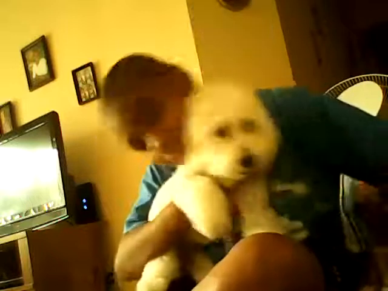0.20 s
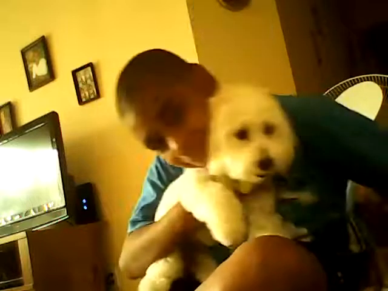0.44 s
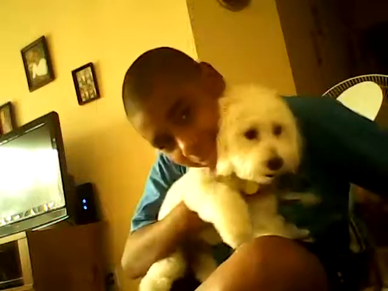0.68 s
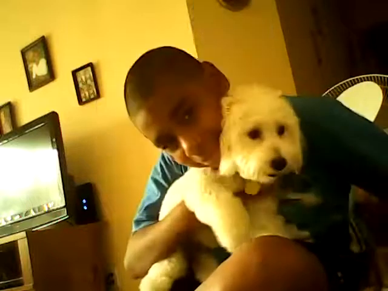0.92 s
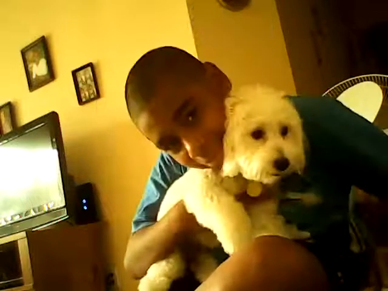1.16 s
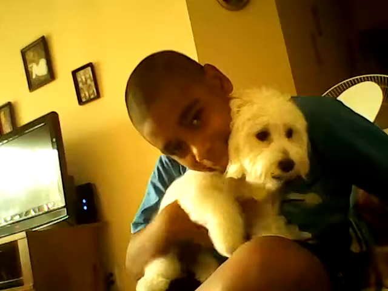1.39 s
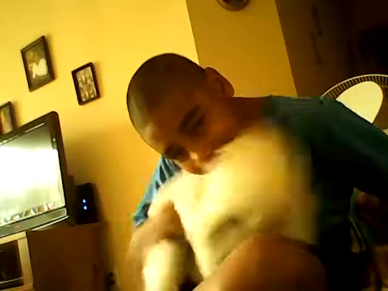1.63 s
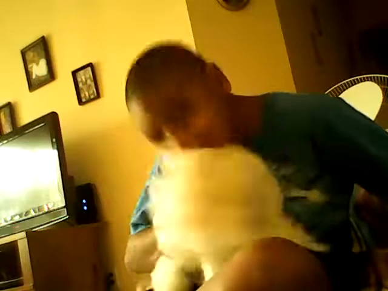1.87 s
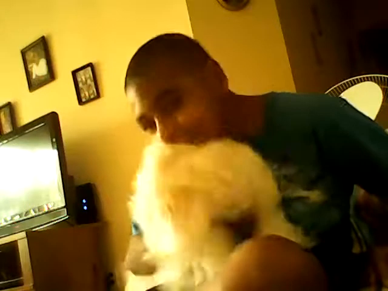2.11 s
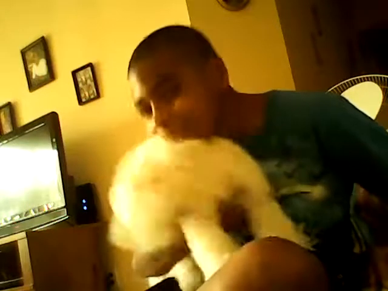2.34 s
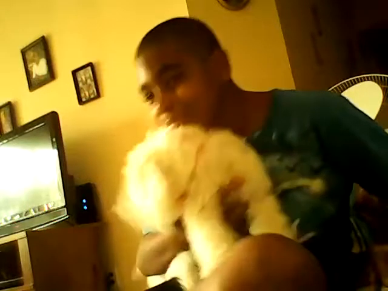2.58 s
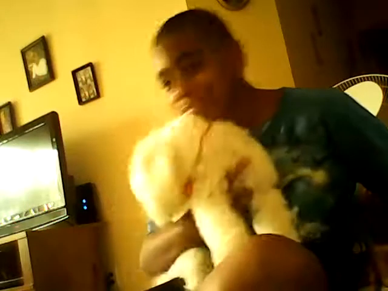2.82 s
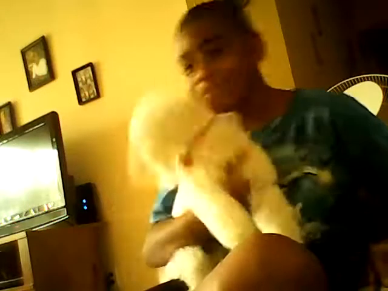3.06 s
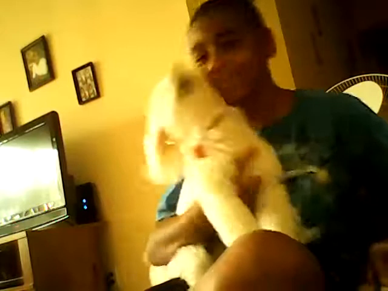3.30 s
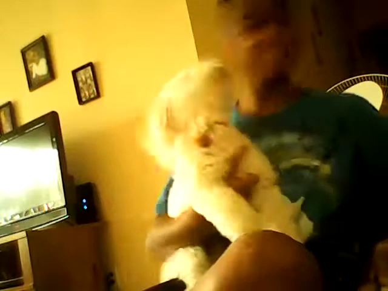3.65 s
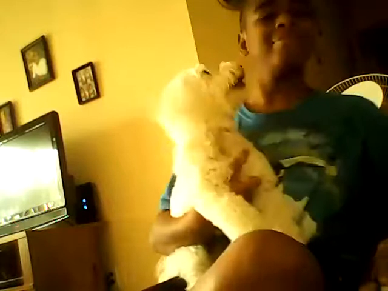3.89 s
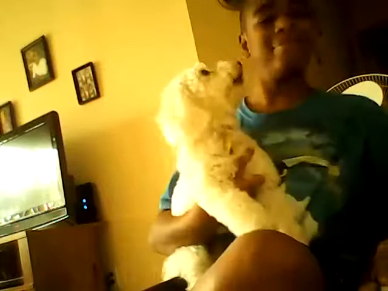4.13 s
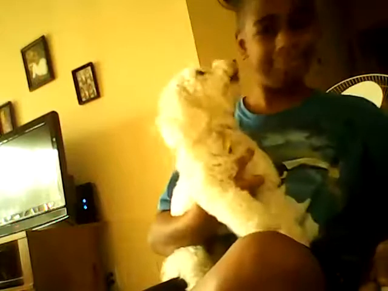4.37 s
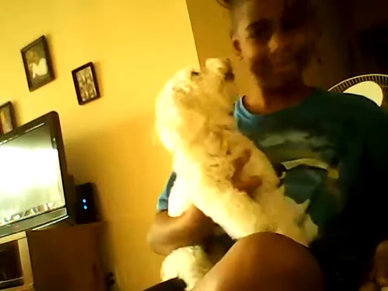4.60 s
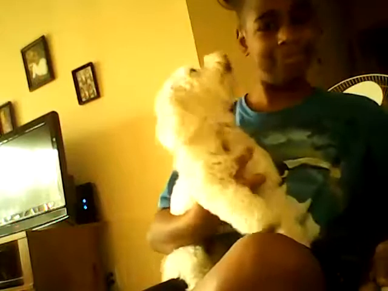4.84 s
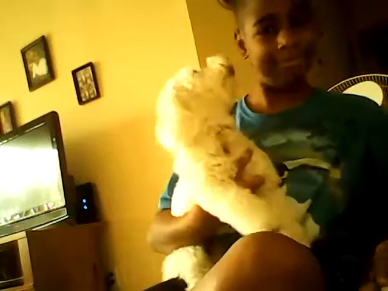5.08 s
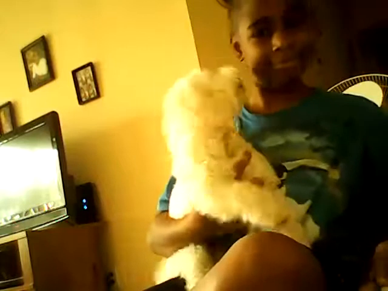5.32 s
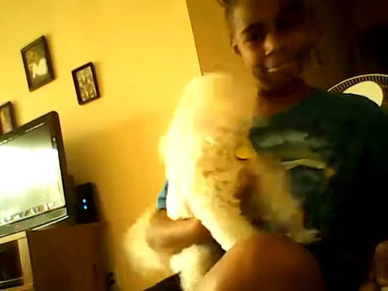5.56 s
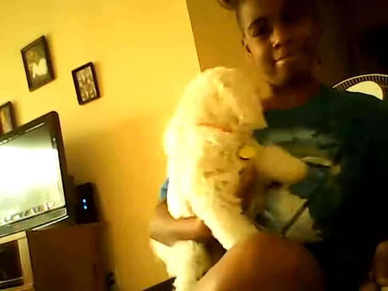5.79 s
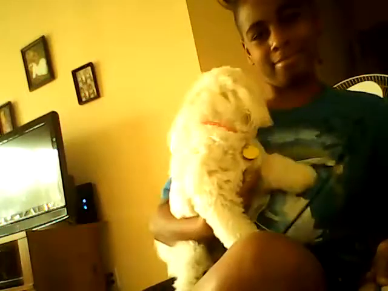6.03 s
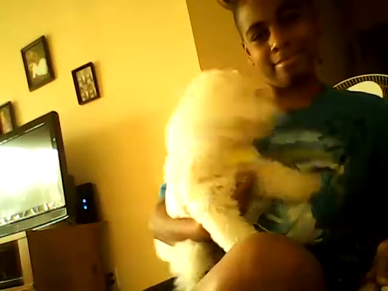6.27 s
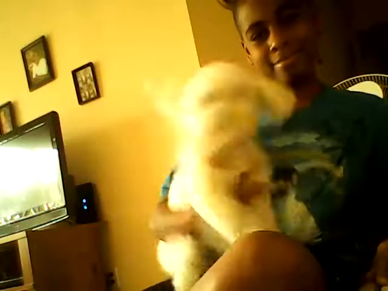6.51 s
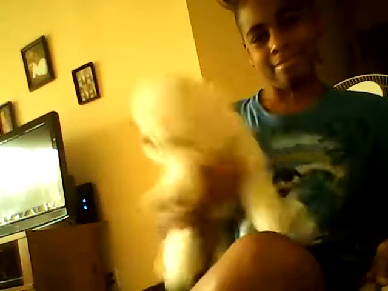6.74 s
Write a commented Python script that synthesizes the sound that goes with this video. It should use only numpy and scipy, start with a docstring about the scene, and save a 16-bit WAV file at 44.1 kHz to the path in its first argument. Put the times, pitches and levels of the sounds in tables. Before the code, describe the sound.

A small dog, close to a small microphone in a living room, starts at once with a rough, fluttering growl until about 0.8 s, then a soft nose puff. A second growl from 1.0 s climbs and breaks at 1.45 to 1.6 s into a loud, clear double yelp, sliding into a moan until 1.85. A lower, uneven growl runs from 2.1 to 2.7, sagging at the end. Muffled grunts follow around 2.9 to 3.05, then gruff ruffs at 3.3 and 3.6 with snorting air. It is nearly quiet until small grunts at 4.4 to 4.5. A sharp ruff at 4.75 leads into a rattling growl from 4.9, cracking into a yelp at 5.45 and growling until 5.65. A grunt at 5.9, two quick ruffs and a short falling yelp at 6.1 to 6.35, a snuff, a grunt at 6.7 and a last ruff near 6.9. Short room ringing, rumble, wavering low hum, hiss and faint whine stay behind.

```python
"""Small dog growling and yelping

A small dog, held on a lap in a living room, growls in bouts, breaks into yelps and grumbles in between.
Its vocal folds beat unevenly in the growl and jump to a clean high register in the yelps; each beat
rings through the throat and mouth. Noise makes the puffs of air and the hisses through the teeth.
The room rings briefly; behind it are a rumble, a low hum, and the hiss and whine of a small microphone
that flattens the highest crests."""
import sys
import numpy as np
from scipy import signal
from scipy.fft import rfft, irfft, next_fast_len
from scipy.io import wavfile
from scipy.ndimage import uniform_filter1d, minimum_filter1d, map_coordinates

SR = 44100
rng = np.random.default_rng(int(sys.argv[2]) if len(sys.argv) > 2 else 0)


def persist_wave(psi):
    """Save psi, clipped to +-1, as 16-bit WAV."""
    counts = np.round(np.clip(psi, -1, 1) * 32767).astype(np.int16)
    wavfile.write(sys.argv[1], SR, np.atleast_2d(counts).T)


N = 306936


def amp(db):
    """Turn decibels into a gain."""
    return 10 ** (np.asarray(db) / 20)


def unit(x):
    """Scale a sound to an average (rms) level of 1."""
    return x / np.sqrt(np.mean(x ** 2) + 1e-20)


def clock():
    """The time of every sample in seconds."""
    return np.arange(N) / SR


def along(points, hz):
    """Read a curve of (f/Hz, value) points on a log frequency axis."""
    f, v = np.transpose(points)
    return np.interp(np.log(hz + 1), np.log(f + 1), v)


def curves(rows):
    """Draw one value per sample for each column after the time, in straight lines between rows."""
    s, *columns = np.transpose(rows)
    return [np.interp(clock(), s, column) for column in columns]


def wobble(rate):
    """A smooth random curve with this many random points a second."""
    return map_coordinates(rng.standard_normal(int(N * rate / SR) + 4), [clock() * rate])


def filtered(x, response):
    """Multiply the spectrum of x by a function of frequency."""
    size = next_fast_len(N + SR // 2)
    return irfft(rfft(x, size) * response(np.fft.rfftfreq(size, 1 / SR)), size)[:N]


def resonate(x, spectrum, size=4096):
    """Filter x to a (f/Hz, level/dB) shape that, like a real cavity, rings only after each pulse."""
    cepstrum = irfft(np.log(amp(along(spectrum, np.fft.rfftfreq(size, 1 / SR)))))
    # folding the cepstrum forward makes the filter causal
    cepstrum[1:size // 2] *= 2
    cepstrum[size // 2 + 1:] = 0
    return signal.fftconvolve(x, irfft(np.exp(rfft(cepstrum))))[:N]


def noise(spectrum):
    """Random noise with the given colour, at rms 1."""
    return unit(resonate(rng.standard_normal(N), spectrum))


def steady(x, span):
    """Hold x near rms 1 over about span seconds, keeping its single pulses."""
    window = np.hanning(int(span * SR))
    power = np.abs(signal.fftconvolve(x * x, window / window.sum(), "same"))
    return x / np.sqrt(power + 1e-14)


def swells(rows):
    """A bell-shaped loudness curve for each (middle s, length s, dB) row."""
    return sum(amp(db) * np.exp(-2 * ((clock() - s) / length) ** 2) for s, length, db in rows)


def puffs(rows):
    """A loudness curve for each (start s, rise s, dB) row: a sudden rise and a slower fall."""
    rises = [(np.maximum(clock() - s, 0) / rise, db) for s, rise, db in rows]
    return sum(amp(db) * u * np.exp(1 - u) for u, db in rises)


def tone(hz):
    """A pure tone of rms 1 that follows a pitch curve."""
    return np.sqrt(2) * np.sin(2 * np.pi * np.cumsum(hz) / SR)


# colour of the rumble and hiss: f/Hz, relative level/dB
FLOOR = [(20, -17.5), (28, -21.5), (40, -1.5), (58, -14), (130, -21), (250, -25.5), (600, -32.5),
         (1500, -40), (5000, -51), (12000, -50), (15700, -53.5)]


def rumble_and_hiss(floor_db=-55):
    """Room rumble and microphone hiss: one noise, strongest in the bass."""
    return amp(floor_db) * noise(FLOOR)


# loudness of the hum, before its wavering: t/s, level/dB
HUM = [(0, -62), (2.5, -60), (2.9, -53), (3.4, -57), (3.9, -52), (5.6, -52.5), (6, -59)]


def appliance_hum(hum_hz=80.4):
    """A low tone whose loudness and pitch both waver."""
    level = amp(curves(HUM)[0] + 1.5 * wobble(3))
    return level * tone(hum_hz * (1 + .006 * wobble(10)))


# electronic whine, around which the pitch drifts: f/Hz, level/dB
WHINE = [(14346, -77)]


def electronic_whine(drift=0.00053):
    """A thin, very high tone that drifts slightly in pitch."""
    return sum(amp(db) * tone(hz * (1 + drift * wobble(25))) for hz, db in WHINE)


THROAT_HZ, THROAT_FALL_DB = 266, 15.5  # throat is loudest at this pitch, this much weaker an octave away


def throat_tuning(pitch, home):
    """Decibels that the throat gains as the pitch moves from home toward its resonance."""
    return THROAT_FALL_DB * (np.log2(home / THROAT_HZ) ** 2 - np.log2(pitch / THROAT_HZ) ** 2)


MOUTH_DB_PER_OCTAVE, SNARL_DB_PER_OCTAVE = 25.5, 32.5  # tighter folds are brighter
SMOOTHER_PER_OCTAVE = 0.97  # and beat more evenly
# share of the breath's push: throat, mouth, snarl
PUSH = (0.34, 0.82, 1.3)


def low_register(s, pitch, home, rough, throat, mouth, snarl, push=0):
    """Rows (s, pitch, roughness, three levels): as the pitch rises, the voice gets cleaner and brighter."""
    octaves = np.log2(pitch / home)
    levels = [throat + throat_tuning(pitch, home),
              mouth + MOUTH_DB_PER_OCTAVE * octaves,
              snarl + SNARL_DB_PER_OCTAVE * octaves]
    pushed = [db + share * push for db, share in zip(levels, PUSH)]
    return np.column_stack([s, pitch, rough - SMOOTHER_PER_OCTAVE * octaves] + pushed)


EASY_HZ = 220  # the pitch at which the growl voices below hold
# course of each growl, and of the moans after a yelp: t/s, basic pitch f/Hz, push of the breath level/dB
GROWLS = [
    [(0, 207.5, 1.5), (.16, 227.7, 2), (.25, 213.1, 4), (.33, 241.3, 2), (.43, 228.2, 1), (.505, 266, -2),
     (.54, 241.7, 2), (.585, 185.2, 1.5), (.625, 232.7, 1.5), (.66, 237.4, 2), (.71, 199.6, 1.5),
     (.77, 150, 1)],
    [(1.035, 164.9, 3), (1.06, 208.3, 5), (1.12, 203.8, 1), (1.2, 188, 1.5), (1.29, 227.7, 1),
     (1.35, 260.2, 3), (1.385, 291, 2), (1.405, 292.6, 0), (1.436, 364.7, 2)],
    [(1.635, 316.6, 0.5), (1.67, 292, 2.5), (1.72, 288.1, -0.5), (1.775, 313.8, 0.5), (1.82, 249.2, 1),
     (1.87, 176, -14.5)],
    [(2.09, 177.9, -4), (2.12, 260.8, -2), (2.148, 272.8, -1), (2.18, 242, -1), (2.215, 197.8, 3),
     (2.27, 235.4, -1.5), (2.355, 229.7, -1), (2.415, 240.8, -2), (2.5, 219.7, -1), (2.59, 203.5, -3),
     (2.63, 164.7, 0), (2.665, 135.1, 3.5), (2.695, 120.3, -9)],
    [(4.86, 196.4, -9), (4.92, 183.8, -9), (4.955, 157.6, 5), (5.01, 202.3, 1), (5.06, 191, 1),
     (5.115, 208.4, -1), (5.17, 191.1, 1), (5.29, 207.3, -2.5), (5.33, 233.8, 0.5), (5.408, 270.3, 4)],
    [(5.516, 261, 5), (5.555, 276.2, -5), (5.61, 241.8, 2), (5.65, 159.2, 3.5)],
]
# voice of each growl before push and final balance: roughness/0-1, throat level/dB (below 600 Hz),
# mouth level/dB (around 1 kHz), snarl level/dB (above about 1.5 kHz)
GROWL_VOICES = [(.85, -25.5, -38, -46), (.38, -26.5, -37, -44), (.35, -21, -44, -54.5),
                (.4, -26, -48.5, -44.5), (.85, -28, -35.5, -49.5), (.42, -27.5, -34.5, -54.5)]


def growl_calls():
    """Each growl follows its own course of pitch and breath in the low register."""
    made = []
    for course, voice in zip(GROWLS, GROWL_VOICES):
        s, pitch, push = np.transpose(course)
        made.append(low_register(s, pitch, EASY_HZ, *voice, push=push))
    return made


def calls():
    """All growls, yelps and ruffs in order of time; each one cuts the one before it short."""
    made = growl_calls() + ruff_calls() + yelp_calls()
    made.sort(key=lambda call: call[0, 0])
    return [call[call[:, 0] < after[0, 0]] for call, after in zip(made, made[1:])] + made[-1:]


ROUGH_DOUBLING = 0.25  # outside the locks, beats of fully rough folds are weak and strong by this share
LOCK_S = .015  # time to lock and to let go
# stretches where the folds lock into an even beat, or a strong and a weak beat in turn:
# from t/s, to t/s, roughness/0-1, doubling/0-1
LOCKS = [(.12, .23, .68, .55), (.28, .44, .58, .6), (.465, .57, .2, .05), (1.03, 1.27, .62, .2),
         (1.31, 1.425, .09, .03), (1.66, 1.81, .12, .03), (2.11, 2.19, .12, .03), (2.27, 2.36, .36, .4),
         (2.48, 2.61, .3, .05), (4.86, 5.0, .84, .65), (5.03, 5.18, .74, .5), (5.21, 5.32, .52, .15),
         (5.345, 5.45, .42, .35), (5.53, 5.62, .32, .1), (6.09, 6.135, .2, .05), (6.185, 6.215, .22, .05)]


def tension():
    """Pitch, roughness and doubling of the folds through the calls and the grunts between them."""
    rows = [(s, pitch, rough) for s, pitch, rough, *levels in np.concatenate(calls())]
    for s, length, db in GRUNTS:
        for side in (-1, 1):
            rows.append((s + side * length, GRUNT_HZ * 2 ** (-GRUNT_SAG * side), GRUNT_ROUGH))
    pitch, rough = curves(sorted(rows))
    rough, t = np.clip(rough, 0, 1), clock()
    doubling = ROUGH_DOUBLING * rough
    for start, end, locked_rough, locked_doubling in LOCKS:
        locked = np.clip(np.minimum(t - start, end - t) / LOCK_S + .5, 0, 1)
        rough = rough + locked * (locked_rough - rough)
        doubling = doubling + locked * (locked_doubling - doubling)
    return pitch, rough, doubling


def pulses(at, sizes, order=8):
    """Sharp pulses placed between samples, kept below the highest frequency."""
    taps = np.floor(at).astype(int)[:, None] + np.arange(1 - order, order + 1)
    offset = taps - at[:, None]
    shape = np.sinc(offset) * np.cos(np.pi * offset / (2 * order)) ** 2
    return np.bincount(np.clip(taps, 0, N - 1).ravel(), (sizes[:, None] * shape).ravel(), N)


def closure(beats, soft_hz=5200):
    """The folds close like a zip: the treble of each pulse lags by up to 3 ms, giving a soft chirp."""
    chirp = lambda hz: np.exp(-2j * np.pi * .003 * hz ** 2 / (hz + 1500))
    return filtered(beats, lambda hz: chirp(hz) / (1 + (hz / soft_hz) ** 4))


WANDER, WANDER_PER_S = .03, 22  # a rough voice strays from its pitch by about this share, this often


def folds(jitter=0.095, shimmer_db=3.5, limp=0.1, air=0.021, rough_air=0.95, flutter_db=4.5, hiss_hz=450):
    """One pulse per closure; roughness scatters them, doubling makes them weak and strong in turn."""
    pitch, rough, doubling = tension()
    waver = (.003 + .075 * rough ** 2) * wobble(85)  # slack folds cannot hold their pitch
    stray = WANDER * rough * wobble(WANDER_PER_S)
    phase = np.cumsum(pitch * (1 + waver + stray)) / SR
    count = np.arange(1, int(phase[-1]))
    at = np.interp(count, phase, np.arange(N))
    here = at.astype(int)
    r, period = rough[here], SR / pitch[here]
    late, strong = rng.standard_normal((len(at), 2)).T
    odd = (-1) ** count * doubling[here]
    sizes = np.sqrt(period) * amp(shimmer_db * r * np.tanh(strong)) * (1 + odd)
    delay = period * (jitter * r ** 2 * late - limp * odd)  # weak beats also come late
    beats = closure(pulses(at + delay, sizes))
    # air hisses through the slit once a cycle
    hiss = unit(rng.standard_normal(N) * (1 + np.cos(2 * np.pi * phase)))
    hiss = filtered(hiss, lambda hz: hz / np.hypot(hz, hiss_hz))
    # loose tissue flutters in the flow
    flutter = amp(flutter_db * rough * wobble(73))
    return (beats + (air + rough_air * rough ** 0.71) * hiss) * flutter


TREMBLE_DB, TREMBLE_PER_S = 1, 20  # the rougher the voice, the more its level trembles


def effort():
    """Gains of the throat, mouth and snarl ranges; the voice stops between bouts."""
    voiced, made = np.zeros(N + SR), calls()
    for call in made:
        voiced[max(0, int(call[0, 0] * SR)):int(call[-1, 0] * SR)] = 1
    bridge = int(.09 * SR)  # the voice carries on through shorter gaps
    voiced = minimum_filter1d(-minimum_filter1d(-voiced, bridge), bridge)[:N]
    pitch, rough, *levels = curves(np.concatenate(made))
    tremble = TREMBLE_DB * rough * wobble(TREMBLE_PER_S)
    return uniform_filter1d(amp(levels + tremble) * voiced, int(.008 * SR))


TURN_S = 0.019  # the head takes this long to change pose
# the tract facing forward, mouth nearly shut and wide open: f/Hz, relative level/dB
SHUT = [(115, -17), (170, -3), (225, -0.5), (350, -2), (470, -9.5), (555, -22.5), (780, -9), (1100, -18.5),
        (1420, -34.5), (1760, -20), (2250, -15), (2900, -33), (3400, -34), (4250, -38.5), (5000, -49),
        (5700, -39.5), (9000, -49.5), (11000, -72.5)]
OPEN = [(100, -42.5), (280, -9.5), (560, -12.5), (1050, 2.5), (1400, -16.5), (2050, -13), (3150, -24.5),
        (3850, -40), (4300, -36.5), (4950, -53), (6300, -36.5), (9000, -47), (12000, -70.5)]
# shut and open with the muzzle raised, which lengthens the throat: f/Hz, relative level/dB
SHUT_RAISED = [(60, -44.5), (125, 0), (200, 1), (285, 2.5), (400, 10.5), (590, -12), (830, -6),
               (1050, -20.5), (1450, -19), (1680, -26), (1920, -22), (2400, -22), (3300, -36.5),
               (4900, -52), (5750, -57), (6500, -53), (10000, -77.5)]
OPEN_RAISED = [(100, -11), (260, 8.5), (450, 5.5), (600, -5.5), (930, 2.5), (1300, -3.5), (1650, 2),
               (1950, 10), (2400, -9), (3200, -7), (3750, -25.5), (4100, -21.5), (5200, -47), (7000, -30),
               (10000, -68)]
# shut, with the head turned away: f/Hz, relative level/dB
SHUT_TURNED = [(115, -14), (230, 0), (490, -3.5), (620, -11.5), (850, 9.5), (1200, 5.5), (1520, -23),
               (2150, -19), (3000, -36.5), (3450, -35.5), (5000, -56), (6200, -44.5), (9000, -76)]
# open, with the muzzle tucked in: f/Hz, relative level/dB
OPEN_TUCKED = [(120, -40), (280, 14.5), (460, 13), (950, 4.5), (1150, -2), (1500, -27), (1800, -11),
               (2300, -4.5), (2900, -6.5), (3700, -22), (4300, -23), (5000, -48), (10000, -66)]
# poses of the head: reached at t/s, shut tract, open tract
POSES = [(0, SHUT, OPEN), (2, SHUT_TURNED, OPEN), (3.5, SHUT, OPEN_RAISED), (4.2, SHUT_RAISED, OPEN_RAISED),
         (5.51, SHUT_RAISED, OPEN), (6, SHUT_RAISED, OPEN_TUCKED), (6.6, SHUT_RAISED, OPEN)]


def tract(source, opening):
    """Each pose of the head has its own resonances, blended by mouth opening."""
    voice = np.zeros(N)
    for start, shut, wide in POSES:
        shaped = (1 - opening) * resonate(source, shut) + opening * resonate(source, wide)
        voice = voice + (shaped - voice) * np.clip(1 + (clock() - start) / TURN_S, 0, 1)
    return voice


# small moves of tongue and lips: typical depth, how often, width of a patch of frequencies
SWAY_DB, SWAY_PER_S, SWAY_HZ = 1.8, 12, 350
# narrow bands of the voice that stand out for a moment, most of them gliding in pitch:
# middle t/s, length t/s, first f/Hz, last f/Hz, gain level/dB
BANDS = [(.51, 0.055, 1050, 920, 7), (.52, 0.044, 1800, 1710, 8), (1.395, 0.09, 2220, 3217, 7.5),
         (1.55, 0.045, 4604, 4434, 5), (1.76, .17, 5620, 6100, 11), (1.766, 0.27, 1310, 1450, 19.5),
         (2.145, 0.037, 1890, 1920, 8), (2.422, 0.062, 1195, 1222, 9), (3.36, 0.068, 1200, 1600, 11.5),
         (3.325, .06, 3270, 3400, 8), (3.597, 0.051, 2040, 2080, 8), (4.755, 0.039, 2020, 1899, 8),
         (5.036, .15, 1940, 1910, 12.5), (5.417, 0.078, 2120, 1817, 8.5), (5.489, 0.073, 2477, 2150, 16.5),
         (6.16, 0.17, 1590, 1519, 11.5), (6.89, 0.03, 1650, 2220, 7)]


def moving_colour(voice, width_octaves=0.17):
    """The voice's colour shifts slightly all the time; narrow bands stand out for a moment, most gliding."""
    hz, t, z = signal.stft(voice, SR, nperseg=512)
    grid = np.meshgrid(hz / SWAY_HZ, t * SWAY_PER_S, indexing="ij")
    knots = rng.standard_normal([int(axis.max()) + 2 for axis in grid])
    treble_only = np.clip(hz[:, None] / 1000 - .5, 0, 1)  # no sway below 500 Hz, all of it from 1500 Hz
    lift_db = SWAY_DB * map_coordinates(knots, grid) * treble_only
    for s, length, first_hz, last_hz, db in BANDS:
        u = (t - s) / length
        octaves = np.log2((hz[:, None] + 1) / np.interp(u, [-.5, .5], [first_hz, last_hz]))
        lift_db = lift_db + db * np.exp(-2 * u ** 2 - (octaves / width_octaves) ** 2)
    return signal.istft(z * amp(lift_db), SR, nperseg=512)[1][:N]


# echoes off the nearest walls: delay t/s, level/dB (weaker in the bass)
ECHOES = [(.0074, -20.5), (0.0113, -15.5)]


def echo(voice, s, db):
    """A delayed copy of the voice that has lost some bass."""
    return filtered(voice, lambda hz: amp(db) * np.exp(-2j * np.pi * hz * s) * hz / np.hypot(hz, 700))


def dog_voice(source, open_db=-32, throat_db=-3.0, mouth_db=-2.0, snarl_db=-1.21):
    """The folds sound through the tract, which opens as the dog snarls harder."""
    throat, mouth, snarl = effort()
    opening = snarl ** 2 / (snarl ** 2 + amp(open_db) ** 2)
    voice = tract(source, opening)
    voice = voice + sum(echo(voice, s, db) for s, db in ECHOES)
    # split into three ranges, so that each follows its own effort
    low = filtered(voice, lambda hz: 1 / (1 + (hz / 600) ** 12))
    high = voice - filtered(voice, lambda hz: 1 / (1 + (hz / 1450) ** 12))
    ranges = [(low, throat * amp(throat_db)),
              (voice - low - high, mouth * amp(mouth_db)),
              (high, snarl * amp(snarl_db))]
    return moving_colour(sum(gain * steady(part, span=0.042) for part, gain in ranges))


WET_DB = -15.5  # the room's ringing under the direct sound
# time the room takes to fade by 60 dB: f/Hz, fade t/s
ROOM = [(150, 0.35), (400, 0.48), (900, 0.65), (2000, 0.3), (3500, 0.6), (8000, 0.062)]


def room(x, gap=.014):
    """The walls answer after a short gap; each frequency dies at its own speed."""
    hz, t, z = signal.stft(rng.standard_normal(SR), SR, nperseg=256)
    fade_db = -60 * t / along(ROOM, hz)[:, None]
    tail = signal.istft(z * amp(fade_db), SR, nperseg=256)[1]
    tail = np.pad(tail / np.linalg.norm(tail), (int(gap * SR), 0))
    return amp(WET_DB) * signal.fftconvolve(x, tail)[:N]


# puffs of air through the nose: middle t/s, length t/s, level/dB
SNUFFS = [(.87, 0.1, -59.5), (2.0, .1, -61), (3.47, 0.054, -60.5), (4.62, 0.032, -68), (6.43, 0.065, -57.5)]
# colour of the nose puffs: f/Hz, relative level/dB
NOSE = [(300, -19.5), (850, -17), (1300, -14), (1900, -9), (2600, -8.5), (3800, -16), (5000, -33.5),
        (11000, -81.5)]


def nose_puffs():
    """Air rushes through the nose: soft swells of coloured noise."""
    return swells(SNUFFS) * noise(NOSE)


# short puffs of air (lips parting, a hard bark onset, a nasal snort): start t/s, rise t/s, level/dB
SHORT_PUFFS = [(1.012, 0.0074, -54), (3.065, 0.0053, -55), (3.556, .012, -43.5), (3.712, 0.019, -45),
               (4.721, .01, -46)]
# colour of the short puffs: f/Hz, relative level/dB
PUFF_COLOUR = [(400, -27), (1500, -14.5), (1850, -1.5), (2250, -8), (2700, -23.5), (3800, -22.5),
               (5000, -43), (10000, -58.5)]


def short_puffs():
    """Air bursts out in short puffs: noise that jumps up and dies more slowly."""
    return puffs(SHORT_PUFFS) * noise(PUFF_COLOUR)


# course of each yelp in the high register, before any lock:
# t/s, basic pitch f/Hz, roughness/0-1, push of the breath level/dB, jaw closed/0-1
YELPS = [
    [(1.441, 565, .25, -7.5, 0.01), (1.46, 524.3, .06, 0.5, 0.04), (1.485, 505.2, .03, 2.5, 0),
     (1.503, 497.8, 0.08, -1, 0.06)],
    [(1.511, 558.9, 0, -1, 0.06), (1.517, 571.2, 0, 2.5, 0.08), (1.54, 533.4, 0.02, -4, 0),
     (1.551, 502.6, 0, -3, 0), (1.568, 486.8, .05, -3, 0), (1.58, 441.1, 0.35, 1.5, 0.34),
     (1.63, 343.4, .55, -9, .25)],
    [(5.414, 471.6, 0.4, -1.5, 0.23), (5.432, 475.7, 0.5, 0.5, 0.17), (5.458, 473.4, 0.1, -1, 0.02),
     (5.478, 462.7, .05, -3.5, 0.21), (5.495, 439.5, 0.2, 8, 0.79), (5.51, 395.5, 0.4, -4, .5)],
    [(6.223, 467.8, 0.3, 4, 0.16), (6.243, 491.8, .05, 3, 0.14), (6.26, 458.4, .05, -5.5, 0.06),
     (6.28, 401.5, 0.2, 1, 0.74), (6.3, 380, .05, -0.5, 0.9), (6.322, 360.7, 0.1, -1.5, 0.97),
     (6.343, 394, 0.4, -2, 0.84), (6.365, 350, 0.4, -8, 0.81)],
]
# voice of each yelp with the jaw open, before push and final balance:
# throat level/dB, mouth level/dB, snarl level/dB
YELP_VOICES = [(-41.5, -10, -12.5), (-34, -17.5, -17), (-31, -19.5, -23), (-33.5, -29.5, -31.5)]
# change when the jaw has closed: throat level/dB, mouth level/dB, snarl level/dB
JAW_DB = (4.5, -13.5, -28.5)


def yelp_calls():
    """The voice breaks into the high register, follows its course and dulls as the jaw closes."""
    made = []
    for course, (throat, mouth, snarl) in zip(YELPS, YELP_VOICES):
        s, pitch, rough, push, jaw = np.transpose(course)
        jaw_open = [throat + throat_tuning(pitch, pitch[0]), mouth, snarl]
        levels = [db + push + jaw * closed_db for db, closed_db in zip(jaw_open, JAW_DB)]
        made.append(np.column_stack([s, pitch, rough] + levels))
    return made


# slack folds; the pitch sags by this many octaves from the middle of a grunt to one length later
GRUNT_HZ, GRUNT_ROUGH, GRUNT_SAG = 129.8, .8, .2
# short closed-mouth grunts: middle t/s, length t/s, level/dB
GRUNTS = [(2.871, 0.018, -51), (2.925, 0.04, -47.5), (3.008, 0.031, -47.5), (3.044, 0.038, -45.5),
          (4.42, 0.04, -46.5), (4.508, 0.067, -43.5), (5.867, 0.022, -46.5), (6.714, 0.039, -46)]


def grunts(source, muffle_hz=1100, breathy=0.12):
    """Soft, breathy rattles of the folds, muffled by the shut mouth."""
    rattle = resonate(source + breathy * rng.standard_normal(N), SHUT_RAISED)
    muffled = filtered(rattle, lambda hz: 1 / np.hypot(1, hz / muffle_hz))
    return swells(GRUNTS) * steady(muffled, span=0.023)


RUFF_SWELL_DB, RUFF_EASE_DB = 5.5, 4  # the breath is this much weaker at the start and at the end
# short gruff barks: start t/s, rise t/s, fall t/s, top pitch f/Hz, depth of the arch/octaves, its roundness,
# then at the top, before final balance: roughness/0-1, throat level/dB, mouth level/dB, snarl level/dB
RUFFS = [(3.258, 0.095, .058, 197.2, .65, 2.4, .3, -32.5, -45.5, -45.5),
         (3.556, 0.038, .125, 226.6, .6, 1.4, .38, -28, -34, -39),
         (4.724, .042, .075, 292.7, .42, 2.1, .2, -28, -26, -30.5),
         (6.077, 0.051, .035, 295.2, .6, 1.1, .3, -31.5, -27.5, -39),
         (6.176, 0.05, .02, 315.4, .45, 1.1, 0.4, -33, -25, -35.5),
         (6.859, .04, 0.018, 254.7, 0.45, 1.3, 0.22, -31.5, -35, -43)]


def ruff_calls(count=17):
    """A ruff is one shove of breath: the folds tighten quickly and slacken again, arching the pitch."""
    made = []
    for start, rise, fall, top_hz, depth, roundness, *voice in RUFFS:
        u = np.linspace(-1, 1, count)  # -1 at the start, 0 at the top, 1 at the end
        s = start + rise + u * np.where(u < 0, rise, fall)
        pitch = top_hz * 2 ** (-depth * np.abs(u) ** roundness)
        push = u * np.where(u < 0, RUFF_SWELL_DB, -RUFF_EASE_DB)
        made.append(low_register(s, pitch, top_hz, *voice, push=push))
    return made


# air through the teeth: middle t/s, length t/s, level/dB
HISSES = [(3.34, 0.04, -70), (3.73, 0.025, -79), (4.775, 0.038, -55), (5.19, 0.13, -76.5),
          (6.42, 0.076, -69), (6.895, 0.018, -68)]
# colour of the hisses: f/Hz, relative level/dB
TEETH = [(3000, -30.5), (4700, -11.5), (5700, -0.5), (6700, -26), (7500, -14), (8500, -27), (12000, -58)]


def teeth_hisses():
    """Air is squeezed between the teeth: short swells of bright noise."""
    return swells(HISSES) * noise(TEETH)


def scene():
    """The dog close by, its room and the background."""
    source = folds()
    air = nose_puffs() + short_puffs() + teeth_hisses()
    dog = dog_voice(source) + grunts(source) + air
    background = rumble_and_hiss() + appliance_hum() + electronic_whine()
    return (dog + room(dog) + background)[None]


TOP_HZ = 15720  # the microphone's band limit


def record(dry, ceiling=0.68):
    """The microphone flattens the highest crests and keeps nothing above its band limit."""
    return filtered(np.clip(dry[0], -ceiling, ceiling), lambda hz: hz < TOP_HZ)[None]


dry = scene()
out = record(dry)
persist_wave(out)
```